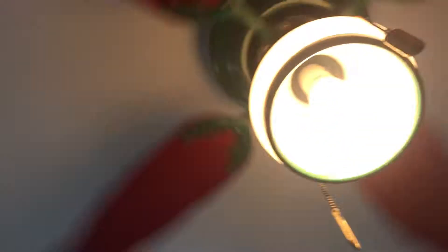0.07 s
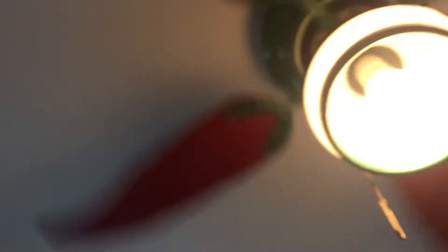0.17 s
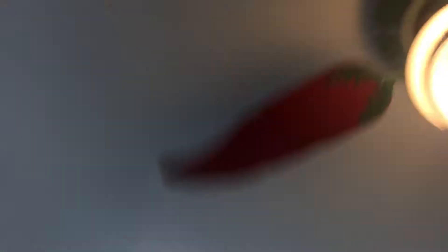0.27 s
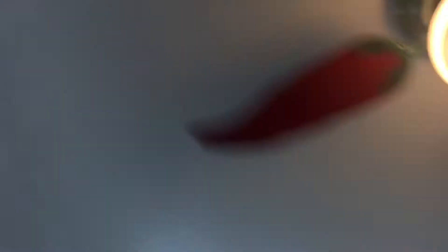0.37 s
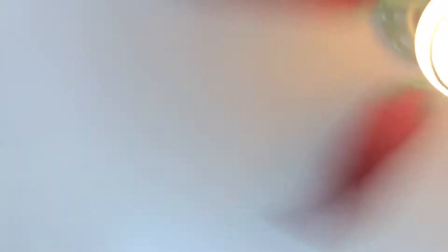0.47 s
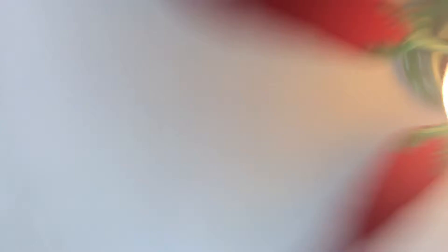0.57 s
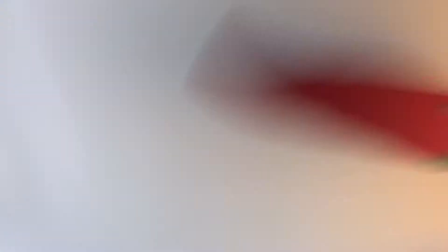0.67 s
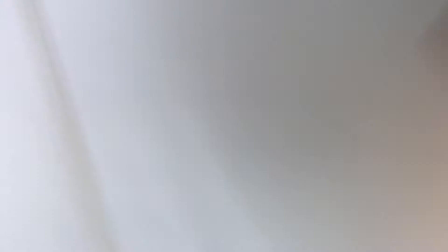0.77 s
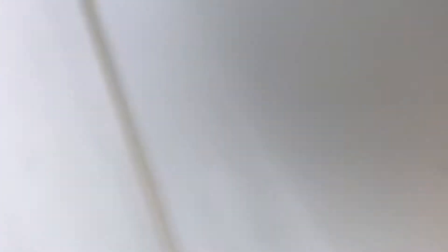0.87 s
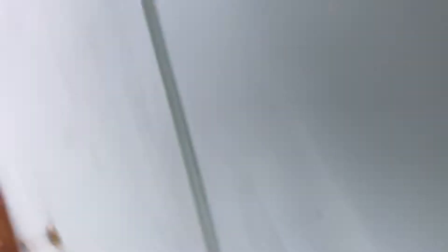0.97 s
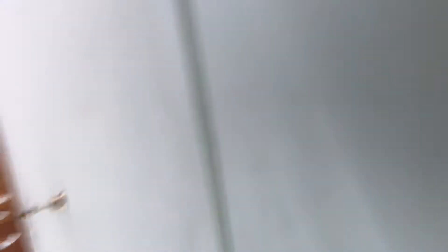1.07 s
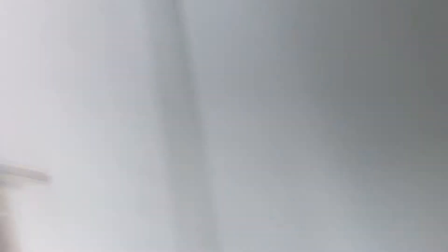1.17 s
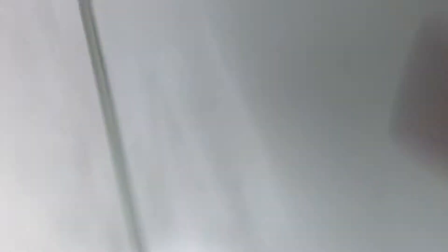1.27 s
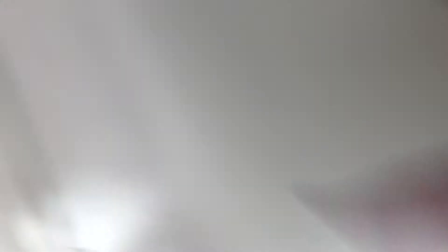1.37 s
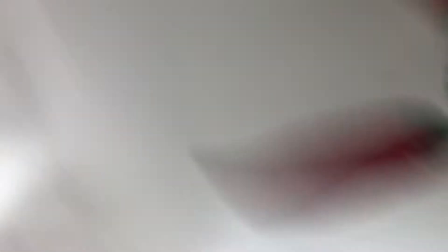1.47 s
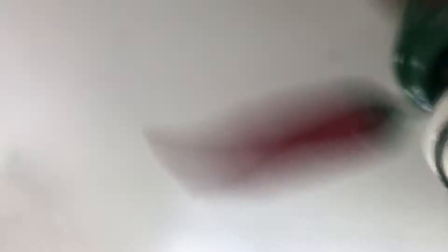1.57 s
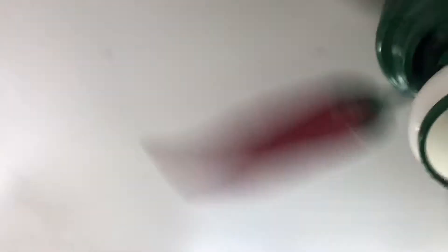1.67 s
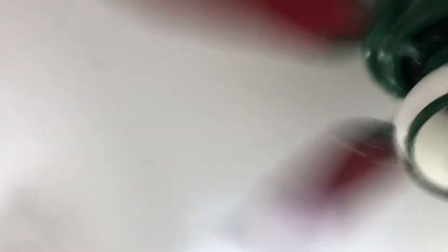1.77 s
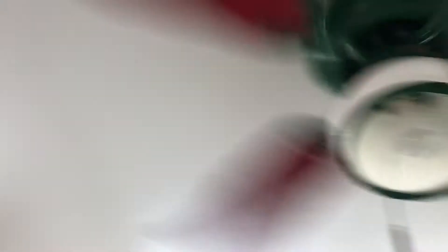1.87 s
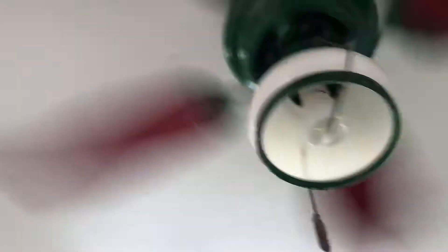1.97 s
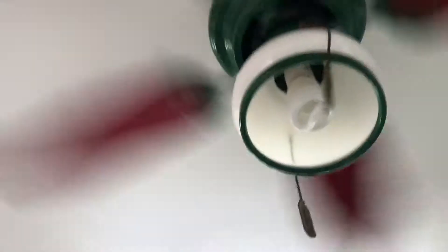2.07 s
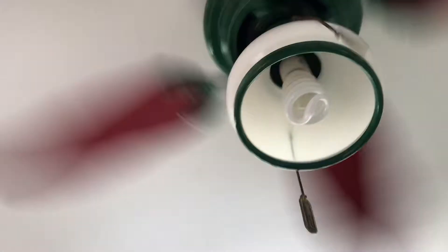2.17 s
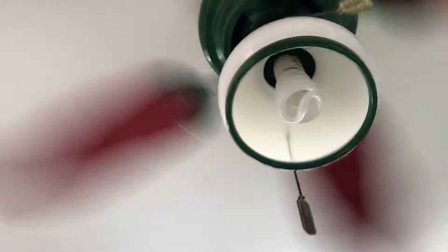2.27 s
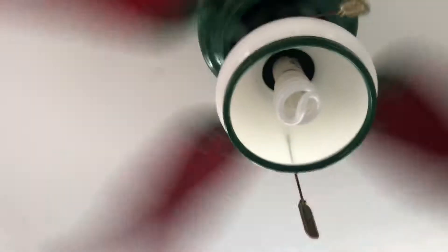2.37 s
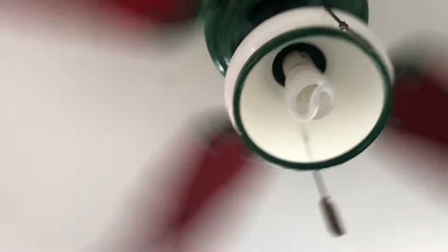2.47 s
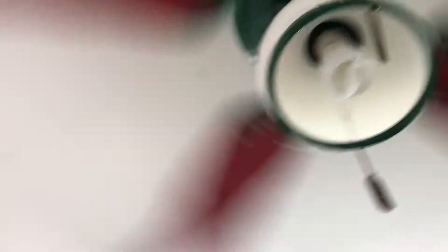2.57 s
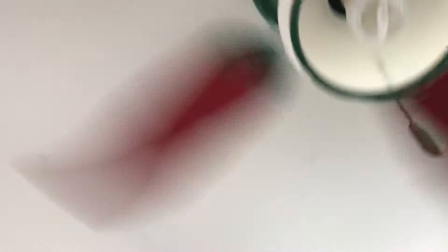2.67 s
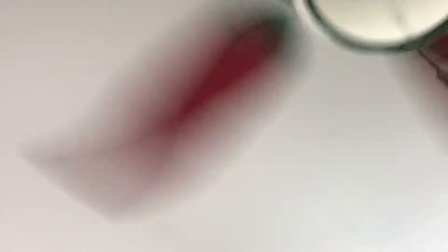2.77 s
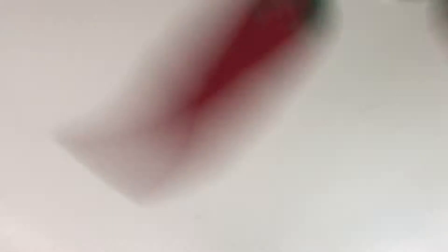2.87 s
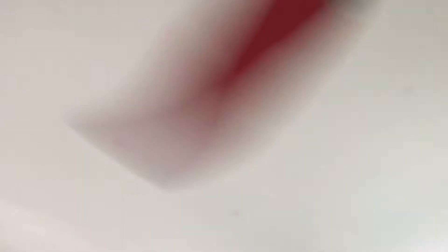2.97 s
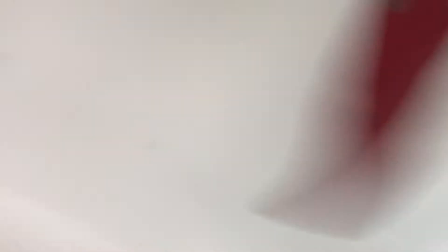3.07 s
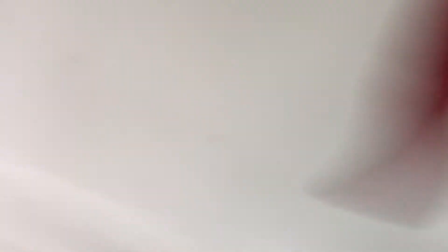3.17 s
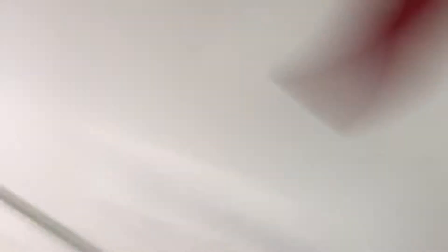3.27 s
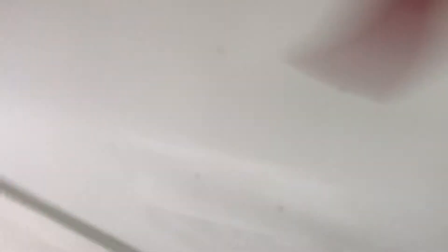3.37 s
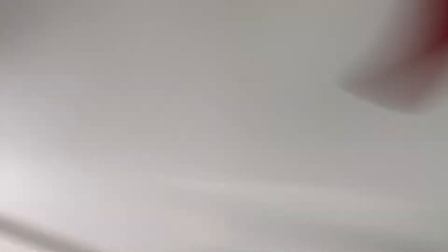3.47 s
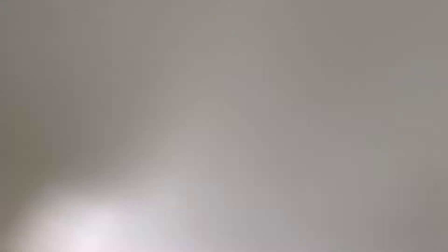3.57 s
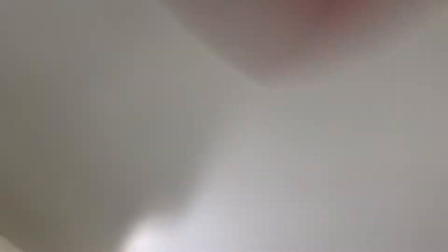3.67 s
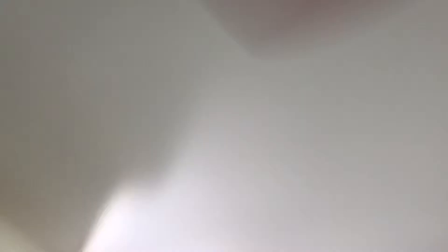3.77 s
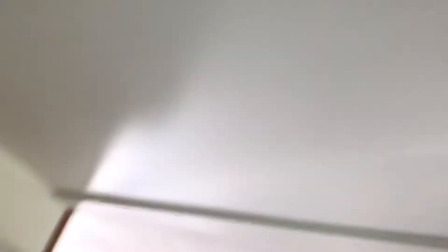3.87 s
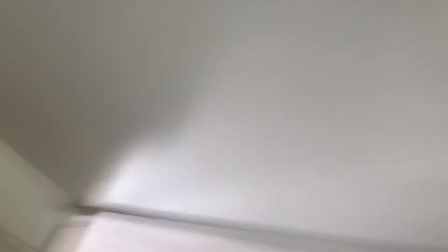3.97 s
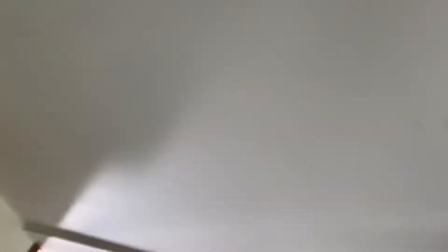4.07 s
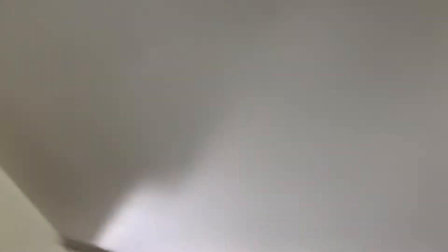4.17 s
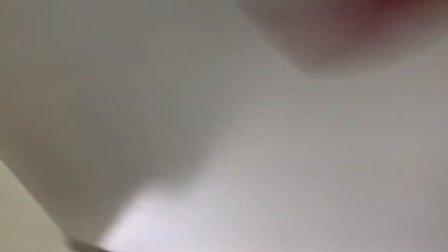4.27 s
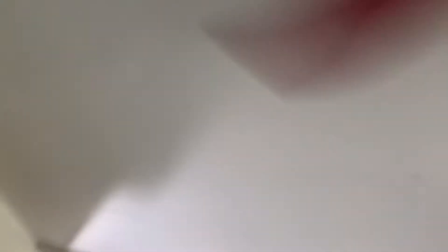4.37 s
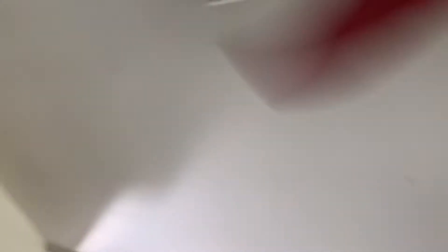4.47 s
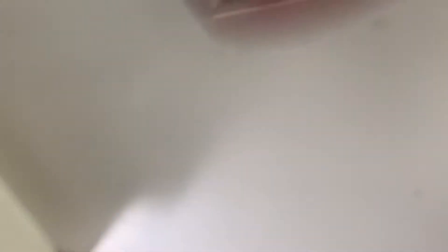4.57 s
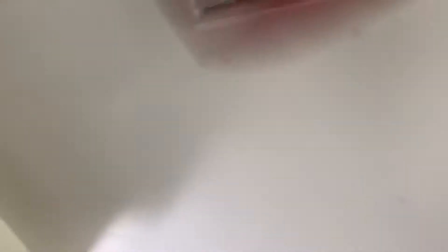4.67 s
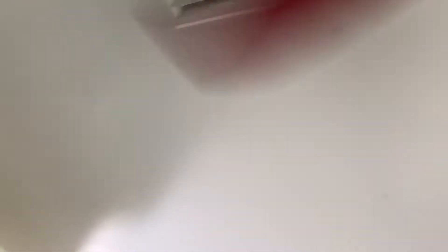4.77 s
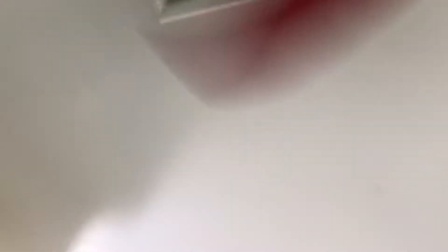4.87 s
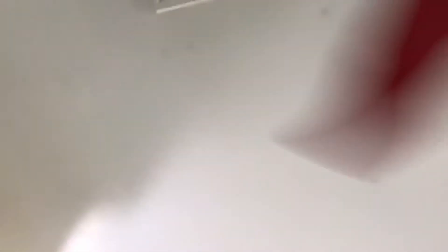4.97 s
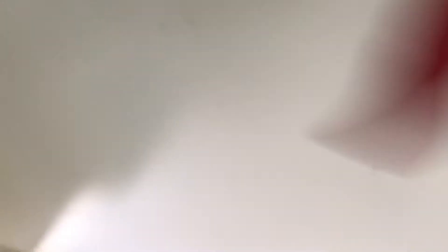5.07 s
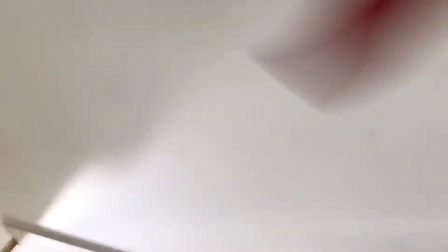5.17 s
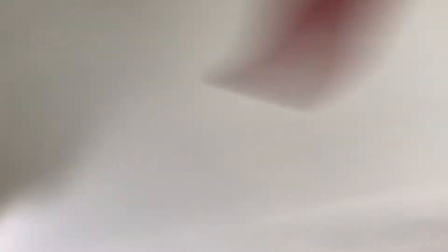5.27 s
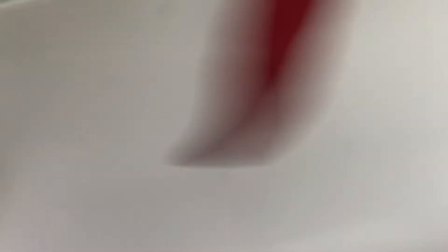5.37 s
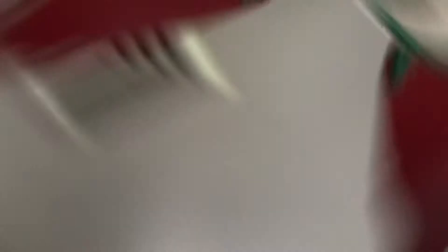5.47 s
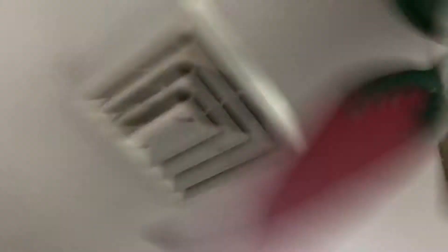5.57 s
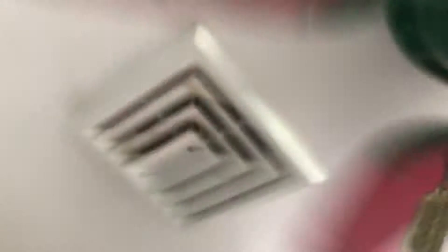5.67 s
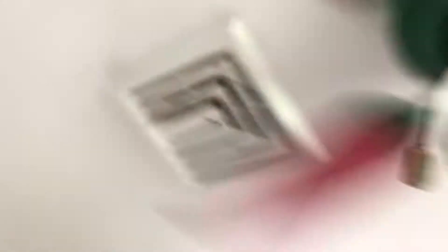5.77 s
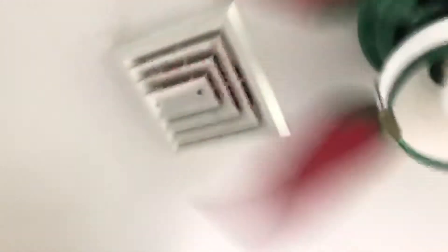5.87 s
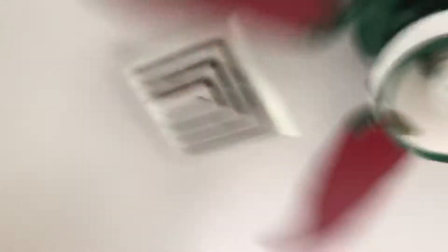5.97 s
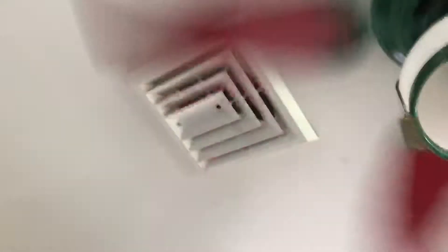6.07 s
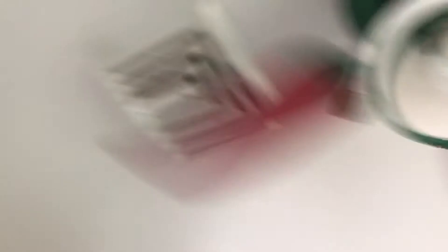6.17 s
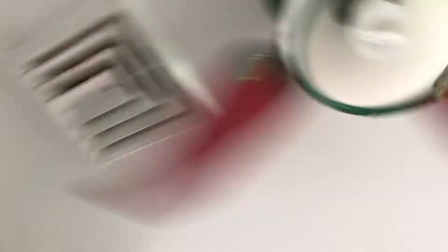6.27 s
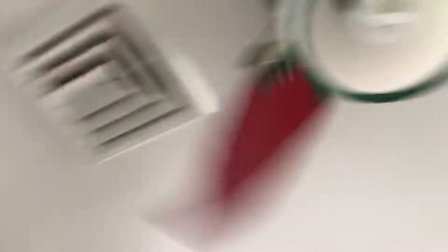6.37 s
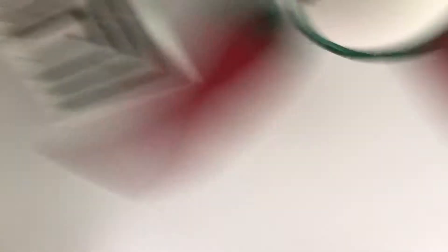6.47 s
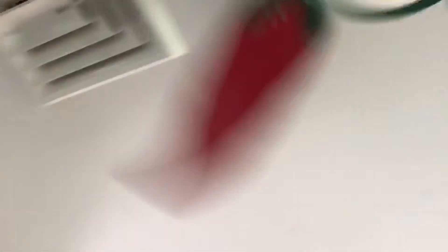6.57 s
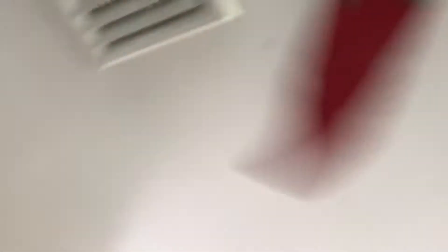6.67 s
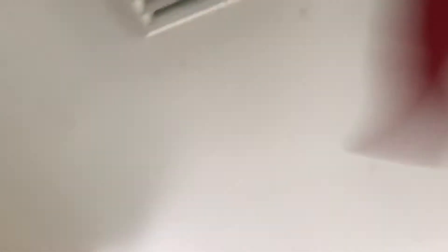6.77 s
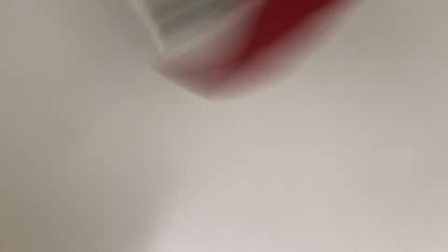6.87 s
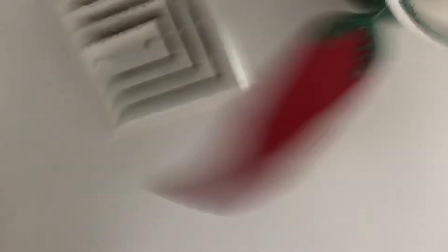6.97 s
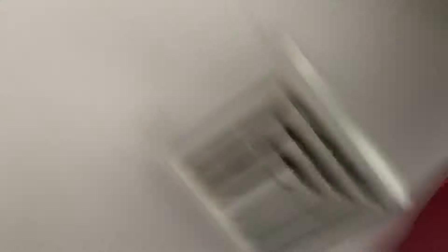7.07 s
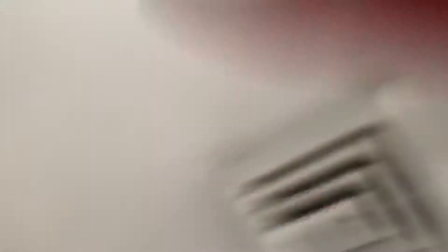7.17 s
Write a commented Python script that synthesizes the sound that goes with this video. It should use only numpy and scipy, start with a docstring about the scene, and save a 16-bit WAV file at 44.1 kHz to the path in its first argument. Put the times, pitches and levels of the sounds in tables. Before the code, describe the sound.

A ceiling fan hums low in a small room while pull chains rasp and snap switches, and a pendant taps the glassy lamp shade.

```python
"""A ceiling fan drones in a small room, by harmonics of its speed and a mains hum over filtered noise of air.
At 1 s a pull rasps a bead chain through its eyelet, snaps the light switch and rocks the fan; the chain clinks.
From 2 s a pendant taps the lamp shade at each swing, while the drone rises in pitch and later falls back.
At 3.9 s and 5.8 s the speed chain is pulled; after the last pull it scrapes back and clinks. Throughout,
clothes brush and fingers bump the camera. Contacts are noise bursts that excite resonances and the room."""
import sys
import numpy as np
from scipy import signal
from scipy.fft import rfft, irfft, next_fast_len
from scipy.io import wavfile
from scipy.ndimage import map_coordinates

SR = 44100
rng = np.random.default_rng(int(sys.argv[2]) if len(sys.argv) > 2 else 0)


def wav_out(sig):
    """Save sig, one row per channel (or a flat mono array), as 16-bit PCM at SR to the path in sys.argv[1]."""
    wavfile.write(sys.argv[1], SR, np.round(np.clip(np.atleast_2d(sig).T, -1, 1) * 32767).astype(np.int16))


N = 317961
TIME = np.arange(N) / SR  # s

# All tabulated levels are relative: some sources add their own gain on top.
# Pitch of the drone, from the motor's speed: [t/s, f/Hz]
MOTOR_SPEED = [(0, 45.12), (2.4, 45.31), (3.1, 47.66), (4.3, 47.35), (5.3, 45.77), (7.21, 45.33)]
# Drone harmonics at the moving camera: [t/s, first level/dB, second level/dB, third level/dB]
DRONE_HARMONICS = [(0, -52, -74, -57.5), (1.3, -55, -53, -61), (2.3, -53.5, -58.5, -56.5),
                   (3.1, -46.5, -47.5, -68), (3.6, -48, -52.5, -63), (4.3, -49, -42, -67),
                   (7.21, -48.5, -40, -61)]
# Magnetic hum of the windings, dropping sharply near 4 s and slowly returning: [t/s, level/dB]
WINDING_HUM = [(0, -57.5), (3.9, -56.5), (4.15, -76.5), (5.8, -69), (7.21, -63)]
# Spectra of the stirred air, its hiss and its rumble: [f/Hz, level/dB]
AIR_HISS = [(240, -29.5), (400, 2), (425, -4), (520, -2), (1220, -10), (1790, -9), (5350, -18.5),
            (12700, -32), (16000, -28)]
AIR_RUMBLE = [(22, -23), (36, -1), (62, -1.5), (120, 3), (180, -6), (300, -9), (500, -36)]

# Strokes of the chain through its eyelet: [t/s, level/dB, length/s]
PULL_STROKES = [(1.019, -38, .115), (3.85, -50, .05), (3.952, -39, .02), (5.764, -38.5, .022),
                (5.999, -44.5, .03)]
# Beads that catch hard in the eyelet: [t/s, level/dB]
HARD_BEADS = [(1.017, -22.5), (1.053, -16), (3.839, -32), (3.901, -30.5), (4.009, -28.5), (4.020, -23),
              (4.128, -26), (5.754, -23), (5.829, -20), (5.991, -25), (6.010, -19), (6.031, -21.5)]
# Switch snaps, chain clinks and link pings: [t/s, level/dB, length of contact/s]
LIGHT_SNAPS = [(1.085, 0, 0.014)]
SPEED_SNAPS = [(3.907, -20.5, 0.016), (5.787, -15, 0.016), (5.835, -8, 0.027)]
LIGHT_CLINKS = [(1.2933, 0.014, 0.014)]
SPEED_CLINKS = [(6.1604, -8.5, 0.014), (6.2627, -7.5, 0.014), (6.6769, -25, 0.015)]
LINK_PINGS = [(5.7079, -17.5, 0.0017), (5.7197, -19.5, 0.0027)]
# The fan rocking on its mount: [t/s, level/dB, rise/s, decay by 60 dB/s]
MOUNT_ROCKS = [(1.11, -34.5, .025, 0.41), (3.952, -26.5, 0.031, 0.42), (5.876, -24.5, 0.01, 0.55)]
# Stray taps of the pendant while a tug still jostles it: [t/s, level/dB]
STRAY_TAPS = [(1.514, -25), (4.4195, -46.5), (6.1987, -29.5), (6.2159, -28.5), (6.2271, -30),
              (6.579, -37.5), (6.8693, -39.5)]
# Knocks on the camera, duller where the finger lands softly: [t/s, level/dB, length of contact/s, roll-off f/Hz]
CAMERA_KNOCKS = [(.852, -31, 0.0066, 1100), (1.031, -15.5, 0.0038, 1400), (1.654, -23, .016, 7020),
                 (3.839, -34, 0.013, 6000), (3.852, -28, 0.0094, 6000), (3.952, -33, 0.017, 5000),
                 (5.792, -23.5, 0.02, 3000)]
# Soft finger bumps on the camera: [t/s, level/dB, length of contact/s]
FINGER_BUMPS = [(0.304, -46, 0.13), (0.571, -42.5, 0.043), (3.304, -33.5, 0.047), (3.524, -41, 0.043),
                (3.585, -40, 0.038), (3.634, -38, 0.023), (5.397, -37.5, 0.081), (5.525, -30, 0.028),
                (6.983, -31.5, 0.067), (7.06, -39, 0.094)]
# Clothes brushing: [t/s, level/dB, rise/s]
CLOTH_RUSTLES = [(.14, -53.5, 0.04), (.765, -54, 0.0088), (2.301, -61.5, .03), (3.58, -60, 0.055),
                 (5.06, -58.5, .12), (5.52, -57, 0.079), (7.09, -53, 0.024)]

# Resonances of each struck or shaken part: [f/Hz, width/Hz, level/dB]
LIGHT_SWITCH_MODES = [(1650, 230, -14.5), (3060, 61, -11), (3320, 98, 6), (5340, 230, 0.5),
                      (6000, 120, -11.5), (6240, 54, -13), (7650, 300, -10), (11500, 320, -9.5),
                      (13100, 110, -9.5), (14640, 200, -13)]
SPEED_SWITCH_MODES = [(1800, 200, -12), (2350, 85, -5.5), (3220, 120, 1), (3530, 120, -1), (4230, 110, 0.5),
                      (6000, 220, 0.5), (6450, 250, -14.5), (9180, 250, -2.5), (11620, 500, -7.5),
                      (13500, 750, -7.5)]
LIGHT_CHAIN_MODES = [(3280, 800, -26.5), (8706, 130, 0), (9800, 220, 2), (10700, 220, -12),
                     (13080, 420, -9), (14420, 610, -7.5), (14300, 247.4, -12)]
SPEED_CHAIN_MODES = [(3340, 190, -11), (6350, 110, -13.5), (9195, 180, -1.5), (9336, 130, 1.5),
                     (10230, 67, -9.5), (11900, 120, 10.5), (12600, 150, 2.5), (15210, 400, -11)]
HOUSING_MODES = [(627, 14, -8.5), (1500, 12, -2.5), (2240, 11, -2.5), (2950, 9.3, 3), (3470, 14, 0.5),
                 (3810, 11, 0), (4140, 29, 3), (5970, 16, -0.5), (8050, 18, 0)]
LINK_MODES = [(7250, 210, -1), (8620, 120, 7.5), (10990, 150, -9), (13280, 140, 3), (15300, 120, -9)]
SHADE_MODES = [(1460, 14, -0.5), (2271, 11, 2.5), (3904, 140, -7.5), (4390, 35, -2), (5520, 92, -1.5),
               (6890, 56, 1.5), (8504, 120, -14.5), (9290, 130, -3), (10800, 47, -1), (11170, 60, 7),
               (11920, 130, -36.5), (13100, 110, -23.5)]
MOUNT_MODES = [(42.86, 19, 2.5), (63, 45, 3.5), (100, 28, 1.5), (148, 30, -8), (179, 22, 7), (239, 23, -11),
               (284, 38, -4), (323.8, 41, -2.5)]

# Spectra of the unpitched part of each contact or friction: [f/Hz, level/dB]
SNAP_COLOUR = [(180, -60.5), (300, -17), (2840, -8.5), (3240, -8), (4370, -5.5), (4910, -15), (6100, -11),
               (13100, -14), (16000, -11.5)]
CLINK_COLOUR = [(350, -56), (600, -20), (2740, -45), (3290, -23.5), (4790, -21), (5980, -8), (6510, -16.5),
                (10000, 5.5), (15000, 0.5), (16800, -20)]
BEAD_COLOUR = [(300, -22), (1500, 3), (4000, -10), (7000, 3.5), (11000, 7.5), (15500, 2.5), (17000, -22.5)]
KNOCK_COLOUR = [(60, -12.5), (200, 0), (520, 3), (1000, -14), (2500, -8), (5000, -21), (15000, -29.5)]
BUMP_COLOUR = [(22, -24.5), (40, -3), (65, 9.5), (130, -2), (300, -14), (500, -37.5), (8000, -83)]
RASP_COLOUR = [(150, -30), (250, -0.5), (400, -10), (618, -3.5), (748, -15.5), (1420, -11), (2570, -13.5),
               (4190, -21), (4900, -26), (5830, -18), (10200, -19), (14400, -19), (16000, -24.5)]
CLOTH_COLOUR = [(200, -14), (600, -4), (3500, -5.5), (8000, -10.5), (15500, -16)]

# Reverberation time of the room: [f/Hz, decay by 60 dB/s]
ROOM_DECAY = [(100, 0.2), (500, 0.72), (3000, .7), (8000, 0.49), (15000, 0.31)]

PULL_RISE_DB_PER_S, PULL_FALL_DB_PER_S = 401, 300  # how fast a stroke gathers speed and comes to rest
BEAD_S, TAP_S = 0.016, 0.011  # lengths of contact
SLIP_DB, SLIP_SCATTER_DB = 3, 6  # light beads over their stroke: mean and standard deviation
SWING_START_S, SWING_S, SWING_SLOWS_S = 2.0156, 0.5632, 0.00136  # first tap, first interval, growth a swing
SWING_DB, SWING_LOSS_DB = -35, 0.7  # relative level of the first tap, loss a swing
REBOUND_S, REBOUND_LOSS_DB = 0.072, 15.5  # the pendant falls back on the shade once, this much weaker
RUSTLE_T60_S = 0.55
TOP_HZ = 16200  # band limit of the camera


def motor():
    """Harmonic synthesis: three partials follow the fan's speed; the windings hum at four times the mains f."""
    phase = 2 * np.pi * np.cumsum(curves(MOTOR_SPEED)[0]) / SR
    drone = np.zeros(N)
    for k, level_db in enumerate(curves(DRONE_HARMONICS), 1):
        drone += amp(level_db + 1.4 * wobble(3.7)) * np.sin(k * phase)
    hum_level = amp(curves(WINDING_HUM)[0] + 0.8 * wobble(6))
    hum = hum_level * np.sin(2 * np.pi * 240 * TIME)
    return amp(-0.94) * drone + amp(-0.5) * hum


def pulls():
    """Friction and impact: the chain rasps and rings the housing, single beads catch and the switch snaps over."""
    unevenness_db = 4.5 * wobble(400) + 3 * wobble(70)
    grains = rng.standard_normal(N) * amp(unevenness_db)
    rasp = amp(-4.0) * strokes() * coloured(grains, RASP_COLOUR)
    housing = amp(-7.5) * np.std(rasp) * resonate(rasp, HOUSING_MODES)
    beads = contacts(bead_catches(count=2), BEAD_COLOUR, level_db=-16.5, wet_db=-5,
                     ring=SPEED_SWITCH_MODES, ring_db=-6.5, scatter_db=4.5)
    light = contacts(LIGHT_SNAPS, SNAP_COLOUR, level_db=-18.5, wet_db=-2.5,
                     ring=LIGHT_SWITCH_MODES, ring_db=5.5)
    speed = contacts(SPEED_SNAPS, SNAP_COLOUR, level_db=-17, wet_db=-7.5,
                     ring=SPEED_SWITCH_MODES, ring_db=1.5)
    return rasp + housing + room(rasp) + beads + light + speed


def strokes():
    """Envelope of the chain's travel: exponential growth, a steady hold and exponential decay."""
    total = np.zeros(N)
    for s, db, length in PULL_STROKES:
        before = np.maximum(s - TIME, 0)
        after = np.maximum(TIME - s - length, 0)
        total += amp(db - PULL_RISE_DB_PER_S * before - PULL_FALL_DB_PER_S * after)
    return total


def bead_catches(count):
    """Stick and slip: the hard catches, and count light ones at random moments of each stroke."""
    light = []
    for s, db, length in PULL_STROKES:
        for _ in range(count):
            level_db = db + SLIP_DB + SLIP_SCATTER_DB * rng.standard_normal()
            light.append((s + length * rng.random(), level_db))
    return [(s, db, BEAD_S) for s, db in HARD_BEADS + light]


def retract():
    """Resonant friction: as the switch springs back, its chain scrapes with a duller, mid-pitched grain."""
    grains = rng.standard_normal(N) * amp(4 * wobble(400))
    envelope = swells([(5.955, -42.5, 0.033, 0.23)])
    scrape = envelope * resonate(grains, [(2600, 420, -2), (1900, 320, -12)])
    return scrape + amp(-2) * room(scrape)


def chains():
    """Modal impact: released chains whip back against the fitting; a single link pings."""
    light = contacts(LIGHT_CLINKS, CLINK_COLOUR, level_db=-14.5, wet_db=-6.0,
                     ring=LIGHT_CHAIN_MODES, ring_db=0.5)
    speed = contacts(SPEED_CLINKS, CLINK_COLOUR, level_db=-13.0, wet_db=-9.0,
                     ring=SPEED_CHAIN_MODES, ring_db=-1.5)
    link = contacts(LINK_PINGS, BEAD_COLOUR, level_db=-7.0, wet_db=-13.5, ring=LINK_MODES, ring_db=18.5)
    return light + speed + link


def mount():
    """Forced resonance: each tug rocks the fan, and its mount booms in a few low modes."""
    boom = resonate(rng.standard_normal(N), MOUNT_MODES)

    def band(hz):
        """Band-pass response from about 24 to 350 Hz."""
        return 1 / (1 + (hz / 350) ** 10) / (1 + (24 / (hz + 1)) ** 6)

    return swells(MOUNT_ROCKS) * unit(filtered(boom, band))


def pendant():
    """Damped oscillation: the pendant taps the lamp shade about twice a second, each tap rebounding once."""
    taps = swings(count=7) + STRAY_TAPS
    rebounds = [(s + REBOUND_S, db - REBOUND_LOSS_DB) for s, db in taps]
    rows = [(s, db, TAP_S) for s, db in taps + rebounds]
    return contacts(rows, BEAD_COLOUR, level_db=-12.0, wet_db=-5.5, ring=SHADE_MODES, ring_db=2.5, scatter_db=6)


def swings(count):
    """Times and levels of an oscillation whose period slowly lengthens as it weakens."""
    taps = []
    for k in range(count):
        s = SWING_START_S + k * SWING_S + SWING_SLOWS_S * k * (k - 1) / 2
        taps.append((s, SWING_DB - SWING_LOSS_DB * k))
    return taps


def handling():
    """Impact and friction: fingers bump and knock the camera; clothes brush as the arm moves."""
    bumps = contacts(FINGER_BUMPS, BUMP_COLOUR, level_db=-7, wet_db=-12.5)
    knocks = np.zeros(N)
    for s, db, length, roll_off_hz in CAMERA_KNOCKS:
        knock = contacts([(s, db, length)], KNOCK_COLOUR, level_db=-13, wet_db=-15)
        knocks += filtered(knock, lambda hz: 1 / (1 + (hz / roll_off_hz) ** 4))
    brushes = swells([(s, db, rise, RUSTLE_T60_S) for s, db, rise in CLOTH_RUSTLES])
    return bumps + knocks + brushes * coloured(rng.standard_normal(N), CLOTH_COLOUR)


def air():
    """Turbulence noise: the blades stir a soft hiss over a low rumble, both wavering in level."""
    hiss = amp(-66.68 + 0.4 * wobble(11.0)) * coloured(rng.standard_normal(N), AIR_HISS)
    rumble = amp(-57.5 + 3.4 * wobble(2.5)) * coloured(rng.standard_normal(N), AIR_RUMBLE)
    return hiss + rumble


def room(x):
    """Diffuse reverberation: x convolved with noise in which each frequency dies at its own rate."""
    hz, t, z = signal.stft(rng.standard_normal(SR), SR, nperseg=256)
    decay = amp(-60 * t / along(ROOM_DECAY, hz)[:, None])
    tail = signal.istft(z * decay, SR, nperseg=256)[1]
    return signal.fftconvolve(x, tail / np.linalg.norm(tail))[:len(x)]


def contacts(rows, colour, level_db, wet_db, ring=(), ring_db=0, scatter_db=0):
    """Impact excitation: a burst of tiny impacts cracks, sets modes ringing and is heard again in the room."""
    track, t = np.zeros(N), np.arange(SR * 3 // 4) / SR
    click = signal.unit_impulse(len(t), 100)
    for s, db, length in rows:
        # the burst's exponential falls by 80 dB over the length of contact
        burst = rng.standard_normal(len(t)) * t * np.exp(-np.log(10000) * t / length)
        near = coloured(burst, colour)
        # the room gathers sound from all directions, so its tail has the part's average colour
        tail = room(coloured(click, colour))
        # a short fade-in, scaled to the length of contact, keeps each onset free of clicks
        near = near * (1 - np.exp(-25 * t / length))
        if len(ring):
            # struck at a new spot, the part rings at new strengths if scatter is set
            modes = [(hz, width, mode_db + scatter_db * rng.standard_normal()) for hz, width, mode_db in ring]
            near = near + amp(ring_db) * resonate(burst, modes)
            tail = tail + amp(ring_db) * room(resonate(click, modes))
        # energy grows in proportion to the length of contact
        gain = amp(db + level_db) * np.sqrt(length * SR / len(t))
        add(track, s, gain * (unit(near) + amp(wet_db) * unit(tail)))
    return track


def swells(rows):
    """Envelope of linear rises followed by exponential decays."""
    total = np.zeros(N)
    for s, db, rise, t60 in rows:
        decay_db = 60 * np.maximum(TIME - s - rise, 0) / t60
        total += amp(db - decay_db) * np.clip((TIME - s) / rise, 0, 1)
    return total


def resonate(x, peaks):
    """Modal superposition: x through parallel second-order resonances, at rms 1."""
    def response(f):
        """Sum of the band-pass responses."""
        total = 0
        for centre, width, db in peaks:
            total = total + amp(db) * 1j * f * width / (centre * centre - f * f + 1j * f * width)
        return total

    return unit(filtered(x, response))


def coloured(x, spectrum):
    """Spectral shaping: x under a smooth spectrum, at rms 1."""
    return unit(filtered(x, lambda hz: amp(along(spectrum, hz))))


def filtered(x, response):
    """Linear filtering: the spectrum of x times a response of frequency."""
    size = next_fast_len(len(x) + 8192)
    return irfft(rfft(x, size) * response(np.fft.rfftfreq(size, 1 / SR)), size)[:len(x)]


def wobble(rate):
    """Band-limited fluctuation: a smooth curve through random knots, rate of them a second."""
    return map_coordinates(rng.standard_normal(int(N * rate / SR) + 4), [TIME * rate])


def curves(rows):
    """Linear interpolation in time: one value per sample for each column after t/s."""
    s, *cols = np.transpose(rows)
    return [np.interp(TIME, s, c) for c in cols]


def along(points, hz):
    """Interpolation of (f/Hz, value) points on a logarithmic frequency axis."""
    f, v = np.transpose(points)
    return np.interp(np.log(hz + 1), np.log(f + 1), v)


def amp(db):
    """Amplitude ratio of a level in decibels."""
    return 10 ** (np.asarray(db) / 20)


def unit(x):
    """Normalisation of the mean power: x at rms 1."""
    return x / np.sqrt(np.mean(x ** 2) + 1e-20)


def add(track, s, x):
    """Superposition: mix x into the track from time s."""
    part = track[max(round(s * SR), 0):][:len(x)]
    part += x[:len(part)]


def scene():
    """Superposition of the fan, its chains, the pendant and the hand that holds the camera."""
    fan = motor() + air() + mount()
    chain = pulls() + retract() + chains()
    return (fan + chain + pendant() + handling())[None]


def record(dry):
    """Saturation and band limiting: the camera rounds the loudest peaks and cuts steeply above its limit."""
    ceiling = 0.75
    rounded = dry[0] / (1 + (dry[0] / ceiling) ** 4) ** (1 / 4)
    return filtered(rounded, lambda hz: 1 / (1 + (hz / TOP_HZ) ** 120))[None]


dry = scene()
out = record(dry)
wav_out(out)
```